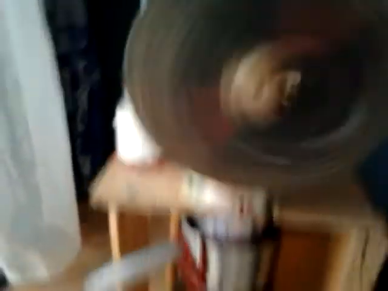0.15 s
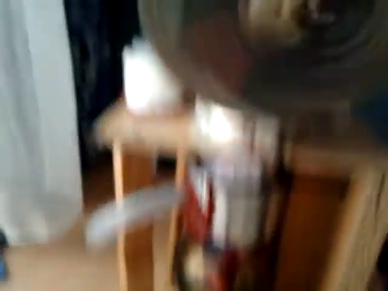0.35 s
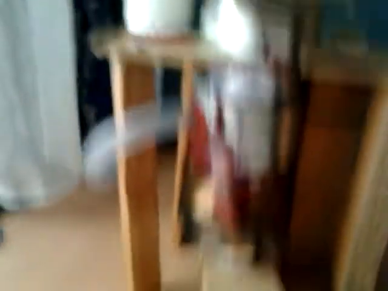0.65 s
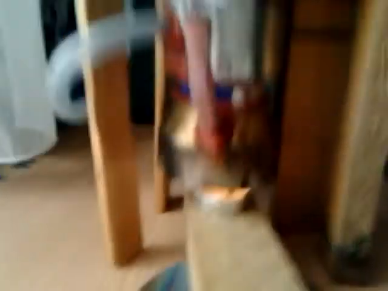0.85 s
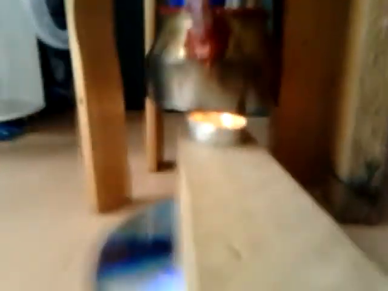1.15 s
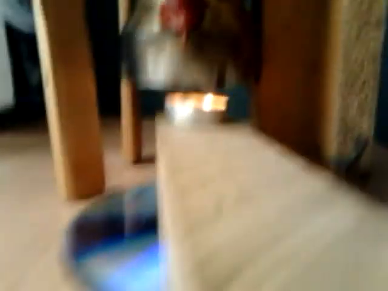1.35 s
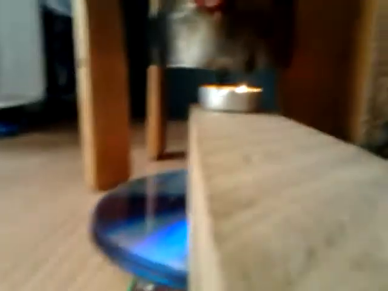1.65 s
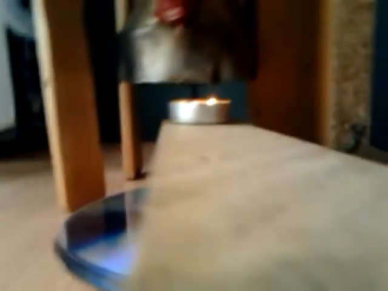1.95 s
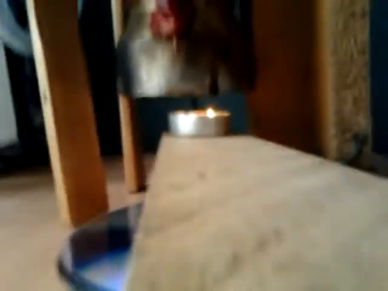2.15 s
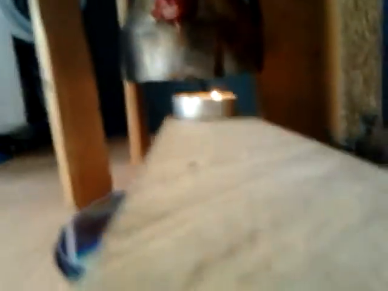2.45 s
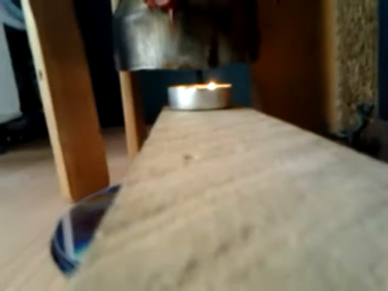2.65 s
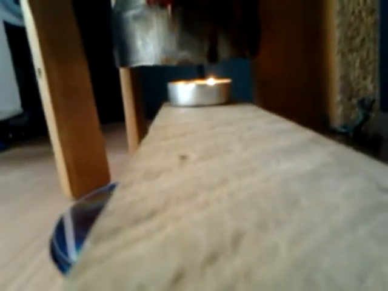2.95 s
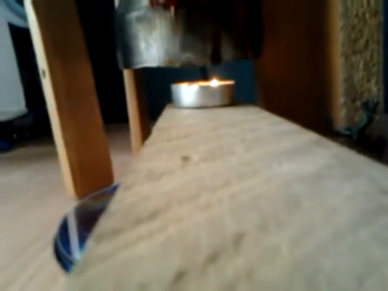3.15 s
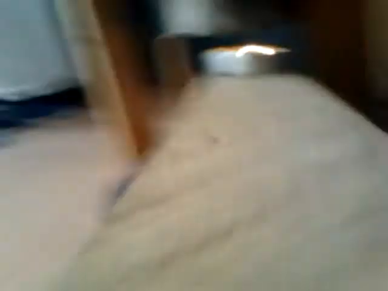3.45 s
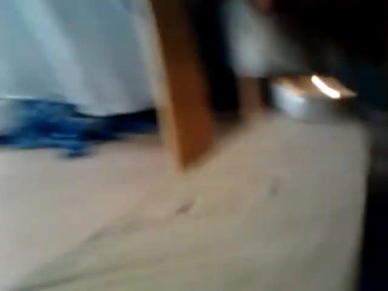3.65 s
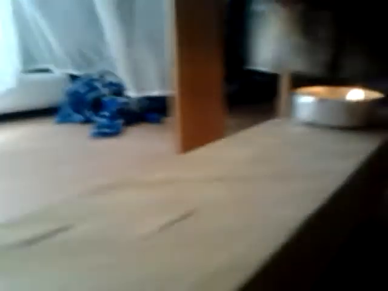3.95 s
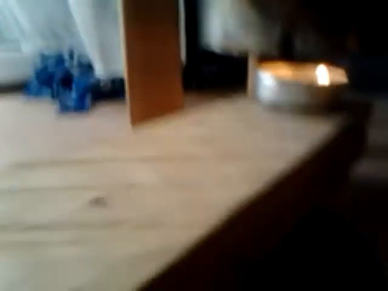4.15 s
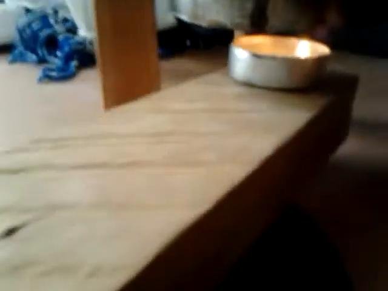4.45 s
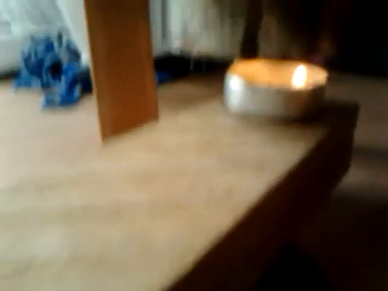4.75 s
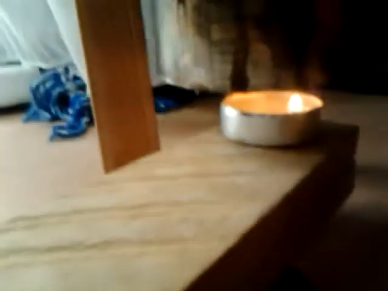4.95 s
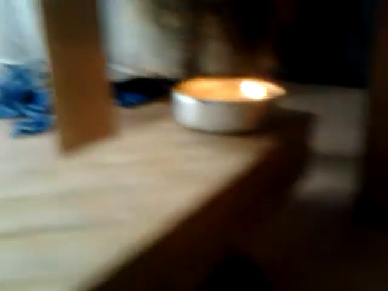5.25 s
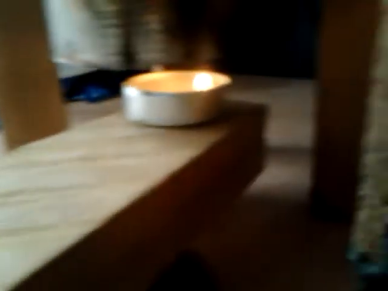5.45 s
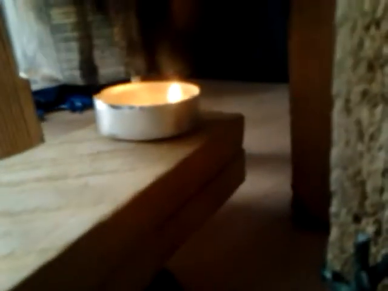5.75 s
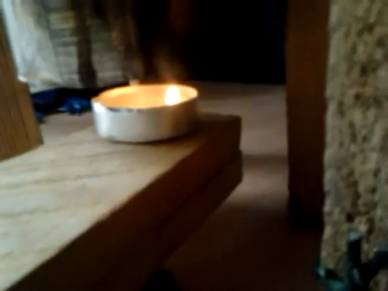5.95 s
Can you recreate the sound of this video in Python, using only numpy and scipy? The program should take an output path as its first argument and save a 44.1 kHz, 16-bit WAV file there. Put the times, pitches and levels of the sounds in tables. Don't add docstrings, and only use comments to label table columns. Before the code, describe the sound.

A small homemade heat engine runs evenly in a quiet room. Dull wooden thumps alternate with rattling metal clacks, each clack followed by a small double rebound, about five beats a second in all. Close on the hand-held microphone, fingers click and rub, busiest around a second and a half and again past three and a half seconds. Low bearing rumble and a faint gated electric whine and hiss lie underneath.

```python
import sys
import numpy as np
from scipy import signal
from scipy.io import wavfile
from scipy.ndimage import uniform_filter1d

SR = 44100
rng = np.random.default_rng(int(sys.argv[2]) if len(sys.argv) > 2 else 0)


def elevation(decibels):
    levels = np.asarray(decibels, float)
    return 10 ** (levels / 20)


def inscribe(sig):
    pcm = np.round(np.clip(np.atleast_2d(sig).T, -1, 1) * 32767)
    wavfile.write(sys.argv[1], SR, pcm.astype(np.int16))


N = 268772

# [t/s, level/dB, overtone level/dB, rod tick level/dB, rod tick lag/s]
THUMPS = [(0.059, -22.5, -5, 3, 0.021), (0.469, -20.5, -10, -41, 0.0078), (0.886, -17, -8, 1, 0.0035),
          (1.297, -17, -2, -8, 0.011), (1.707, -18, -4.5, -3, 0.0073), (2.12, -18.5, -5.5, -5.5, 0.0088),
          (2.528, -17.5, -4, 1, .003), (2.94, -17, -4, 0, 0.0029), (3.35, -17.5, -4.5, 7, 0.015),
          (3.757, -16, -2.5, -3, 0.015), (4.17, -17, -2.5, 13, 0.015), (4.579, -18.5, -6.5, -2.5, 0.014),
          (4.986, -17.5, -4, -7.5, 0.013), (5.394, -16.5, -4.5, -17.5, 0.011), (5.803, -17, -7.5, 1, .012)]
# [f/Hz, level/dB, t60/s]
FRAME = [(63.3, -20.5, .45), (98.4, -8, 0.14), (144, -17, 0.19), (193.4, -7, 0.11), (312, -9.5, 0.094),
         (357.2, -10, 0.068), (392, -7.5, 0.094)]


def thumps():
    s, db = np.transpose(THUMPS)[:2]
    t = np.arange(round(.013 * SR)) / SR
    swell = np.sin(np.pi * (t / t[-1]) ** 2.24)
    shove = swell * np.sin(2 * np.pi * 385 * t) / len(t) * 6.25
    after = np.arange(SR // 5) / SR
    knock = ring(np.pad(shove, (0, len(after) - len(t))), FRAME[4:])

    def choked(seconds):
        return knock * elevation(-14 * np.clip((after - seconds) / .007, 0, 1))

    out = strike(s - .006, db, [choked(.037)] * len(s))
    out += strike(s + 0.049, db - 15.5, [choked(.025)] * len(s))
    push = np.hanning(round(0.0018 * SR))
    out += high_pass(ring(strike(s, db - 43.0, [push] * len(s)), FRAME[:4]), 80)
    t = np.arange(round(0.051 * SR)) / SR
    rocking = np.sin(np.pi * t / t[-1]) * np.sin(2 * np.pi * 137 * t)
    return out + ring(strike(s + 0.04, db - 61, [rocking] * len(s)), FRAME[2:3])


# [f/Hz, level/dB, t60/s]
FRAME_OVERTONES = [(455, -8, .04), (520, -8, .04), (605, -7, .045), (700, -11, .05), (820, -10, .05)]
# [f/Hz, level/dB, t60/s]
CRANK = [(1764, 5.5, 0.048), (1880, -13, 0.005), (2020, 4, 0.018), (2661, 9, 0.034), (2874, -23.5, 0.09),
         (3600, -32, 0.025), (4100, -33.5, .012), (5940, -15, 0.0041), (6740, 3, 0.045), (7685, -17, .015),
         (8750, -51, 0.004)]


def rod_rattle():
    s, db, overtone_db, tick_db, tick_lag = np.transpose(THUMPS)
    db_over = db + overtone_db
    slack = [chatter(0.01, 2400) for _ in s]
    out = blows(s - .014, db_over - 13.5, slack, FRAME_OVERTONES[2:], vary_db=5.5, soft_hz=980)
    fade = np.exp(-np.arange(2400) / SR / 0.033) * 2.0
    dying = [chatter(0.053, 1500) * fade for _ in s]
    out += blows(s - .006, db_over - 4.0, dying, FRAME_OVERTONES, vary_db=5.0, soft_hz=1018.5)
    rod = loose(CRANK[:6] + [(1500, 0.0081, .04)])
    ticks = 0
    for lag, drop_db in ((.0, 40.8), (.013, 42.8), (.045, 49)):
        contacts = [chatter(.012, 4000) for _ in s]
        ticks = ticks + blows(s + tick_lag + lag, db + tick_db - drop_db, contacts, rod, vary_db=1.0, soft_hz=3500)
    return out + high_pass(ticks, 2000)


# [t/s, level/dB, web level/dB, shaft level/dB, sheen level/dB]
CLACKS = [(0.246, -14, -3, -15.5, -33), (0.661, -19.5, 5.5, -25, -25), (1.073, -20.5, -31, 10, 3),
          (1.482, -18.5, 9.5, -3.5, -1.5), (1.894, -17, 3, -1.5, -14), (2.307, -19, -3, 0.5, -17),
          (2.717, -17.5, -5.5, 1, -16.5), (3.128, -19.5, -6.5, 4, -9.5), (3.537, -13.5, -2, -2, -14),
          (3.946, -18.5, 0, 2, -20), (4.356, -14.5, 4.5, -8, -18), (4.762, -17.5, 4.5, -7.5, -20),
          (5.172, -15, 0, 1.5, -2.5), (5.581, -15, -3, -3.5, -7), (5.989, -19.5, 7.5, -17, -8)]
# [t/s, level/dB, brightness/dB, gap between bounces/s]
REBOUNDS = [(0.286, -22.5, -5, 0.0085), (0.7, -25.5, -9, 0.015), (1.113, -21, 0.5, 0.016),
            (1.932, -20, -9.5, 0.014), (2.345, -20, -17.5, 0.0097), (2.756, -19, -12.5, 0.0097),
            (3.165, -24.5, -2, 0.015), (3.574, -18.5, -26, 0.011), (3.979, -21, -23, 0.018),
            (4.391, -19.5, -9, 0.012), (4.8, -20, -7, 0.0084), (5.212, -18.5, -6, 0.0096),
            (5.619, -17.5, -15, 0.011), (6.026, -19, -5.5, 0.0073)]


def clacks():
    s, db, web_db, shaft_db, sheen_db = np.transpose(CLACKS)
    landings = [chatter(0.017, 7000, 1.5) for _ in s]
    out = pin(s - .001, db, web_db, shaft_db, sheen_db, landings, soft_hz=8330)
    s, db, bright_db, gap = np.transpose(REBOUNDS)
    bounces = []
    for g in gap:
        first, second = chatter(0.014, 5000, 1.1), chatter(0.013, 4600, 1.4)
        bounces.append(first + 0.57 * np.roll(second, round(g * SR)))
    return out + pin(s + 0.00045, db, bright_db - 13.0, bright_db, bright_db + 6, bounces, soft_hz=7360)


# [f/Hz, level/dB, t60/s]
CAN = [(460, -16.5, 0.024), (627, 0.5, 0.084), (712, 5.5, 0.04), (804.4, 10.5, 0.034), (1076, -5.5, 0.039)]


def pin(s, db, web_db, shaft_db, sheen_db, shapes, soft_hz):
    early = s - .003
    can = blows(early, db - 17.5, shapes, CAN, vary_db=1.5, soft_hz=2350)
    web = blows(early, db + web_db - 11.0, shapes, loose(CRANK[:3]), vary_db=2.0, soft_hz=soft_hz)
    shaft = blows(early, db + shaft_db - 9.0, shapes, loose(CRANK[3:7]), vary_db=2.0, soft_hz=soft_hz)
    sheen = blows(early, db + sheen_db - 15.5, shapes, loose(CRANK[7:]), vary_db=7.5, soft_hz=soft_hz)
    frame = blows(s, db - 21, shapes, FRAME[3:4], vary_db=3.0, soft_hz=300)
    grit = band_pass(strike(early, db - 16.5, shapes), 583, 3940, order=4)
    rattle = high_pass(web + shaft, 1500) + high_pass(high_pass(sheen, 7400), 7400) + grit
    return high_pass(can, 350) + low_pass(rattle, 9300, order=8) + frame


# [lead/s, level under the clack/dB]
SLIDES = [(.02, -43), (.034, -30), (.03, -55), (.03, -42), (.03, -36), (.03, -34), (.03, -38), (.028, -42),
          (.03, -33), (.03, -31), (.03, -31), (.03, -42), (.03, -52), (.034, -51), (.04, -40)]


def pin_slide():
    s, db = np.transpose(CLACKS)[:2]
    lead, under_db = np.transpose(SLIDES)
    scrapes = [chatter(d, 5000, .9) for d in lead]
    return high_pass(blows(s - lead, db + under_db, scrapes, loose(CRANK[:3]), vary_db=2.5, soft_hz=3000), 1300)


# [t/s, level/dB]
SQUEAKS = [
    (4.813, -35),
    (5.22, -41.5),
]
# [f/Hz, level/dB, t60/s]
BEARING = [(6254, 3, 0.044), (8000, -3, 0.02), (4300, -24, .006)]


def squeaks():
    s, db = np.transpose(SQUEAKS)
    slips = [chatter(0.014, 6700) for _ in s]
    return high_pass(blows(s, db, slips, BEARING, vary_db=0.0, soft_hz=9000), 2930)


def fingers():
    return high_pass(finger_ticks() + finger_knocks() + finger_rub(), 510)


# [t/s, level/dB, hollow ring level/dB, top f/Hz]
TICKS = [(0.0722, -33.5, -24, 7080), (0.3151, -7, -18.5, 6500), (0.9047, -13, -8.5, 12000),
         (1.2161, -50, 15.5, 6000), (1.3018, -20, -9, 7450), (1.361, -26, -15, 4970),
         (1.373, -21.5, -8.5, 6000), (1.4875, -2, -39, 9000), (1.4908, 6.5, -42, 15000),
         (1.5603, -6.5, -16.5, 11000), (1.636, -33, -12, 7500), (1.6557, -16.5, -15.5, 5860),
         (1.6728, -21.5, -17.5, 5500), (1.8137, -12.5, -16, 13000), (1.952, -21.5, -9.5, 5400),
         (1.9644, -26.5, -9.5, 4500), (1.9864, -23.5, -11.5, 7000), (2.5951, -51, 19, 3500),
         (2.7848, -22.5, -23, 4300), (3.3232, -22.5, -19, 9000), (3.3478, -42.5, -8.5, 5880),
         (3.4141, -17.5, -32, 9000), (4.0034, -32.5, -2, 8000), (4.107, -32, -6, 5500),
         (4.125, -25, -14, 7000), (4.184, -36, -7, 5000), (4.4825, -35.5, -3.5, 7150),
         (5.1392, -51, -24, 7500)]
# [f/Hz, level/dB, t60/s]
CASE = [(1433, -16.5, 0.0048), (3080, -2, 0.0086), (3580, -2, 0.0059), (4734, 5, 0.0026),
        (6440, -9.5, 0.0016), (8650, -13.5, 0.011), (12200, -28.5, 0.0054), (14760, -21.5, .002)]
# [f/Hz, level/dB, t60/s]
HOLLOW = [(754, 2, 0.1), (766, 7.5, 0.05), (830, -12, 0.034)]


def finger_ticks():
    s, db, hollow_db, top_hz = np.transpose(TICKS)
    snaps = [chatter(0.0006, 20000) for _ in s]
    case = blows(s, db - 13.5, snaps, CASE, vary_db=-5.5, soft_hz=top_hz)
    hollow = blows(s, db + hollow_db - 7.5, snaps, loose(HOLLOW), vary_db=2.0, soft_hz=2670)
    return case + hollow + band_pass(strike(s, db - 26.5, snaps), 900, 7000, order=2)


# [t/s, level/dB]
KNOCKS = [
    (4.301, -14),
    (4.313, -15.5),
    (4.322, -18),
    (4.337, -22.5),
    (4.711, -44.5),
    (4.932, -48),
    (5.124, -68.5),
    (5.512, -31),
]


def finger_knocks():
    s, db = np.transpose(KNOCKS)
    pads = [chatter(.007, 6000) for _ in s]
    dull_modes = CAN[1:] + [(1350, -3, .012), (1750, -8, .01)]
    return blows(s - .001, db - 14, pads, dull_modes, vary_db=2.5, soft_hz=1800)


# [f/Hz, level per Hz/dB]
RUB_COLOUR = [(590, -34), (1000, -3.5), (1410, -11), (2590, -3.5), (5650, -3.5), (10400, -21.5),
              (14100, -37.5), (15500, -47)]
# [f/Hz, level/dB, t60/s]
SHELL = [(2890, -5, 0.009), (5350, 4, 0.0036)]
# [t/s, level/dB]
SHELL_GRIP = [(0.0, -13), (1.0, -13), (1.3, 4), (1.6, 0), (3.4, -13), (3.9, -4), (4.5, -2)]
# [t/s, level/dB]
AT_PORT = [(0.0, -13), (0.3, -24), (1.4, -15), (1.5, -19), (1.7, -24), (3.3, -16), (3.45, -6.5), (3.49, -6),
           (3.53, -14), (3.6, -13), (3.64, -2), (3.7, -4), (3.73, -13.5), (3.76, -21), (3.79, -5),
           (3.86, -1.5), (3.95, -15)]


def finger_rub():
    grains = rng.standard_normal((2, N)) * elevation(2.1 * rng.exponential(1, (2, N)) + 1.6 * drift(90))
    hiss = coloured(grains, RUB_COLOUR, patchy_db=1.5)
    hollow = rms_one(ring(grains[0], HOLLOW))
    pressure_db, bright_db = stroking()
    pressure = elevation(pressure_db + 0.5 * drift(35))
    cupping = pressure * elevation(-9.5 + 6.5 * drift(12))
    walls = rms_one(ring(low_pass(grains[1], 6000, order=4), SHELL))
    hiss = hiss + elevation(in_time(SHELL_GRIP)[0]) * walls
    low = signal.sosfiltfilt(signal.butter(3, 5830, fs=SR, output="sos"), hiss)
    brighter = np.minimum(pressure / elevation(-40), 1.3) ** 2.1
    hiss = low + (hiss - low) * brighter * elevation(bright_db)
    low = signal.sosfiltfilt(signal.butter(4, 10300, fs=SR, output="sos"), hiss)
    hiss = low + (hiss - low) * elevation(in_time(AT_PORT)[0])
    return 0.83 * pressure * hiss + cupping * hollow


# [start t/s, length/s, first pressure level/dB, last pressure level/dB, brightness/dB]
STROKES = [(0.074, 0.017, -44.5, -62, 2), (0.245, 0.05, -55, -60, -3), (0.311, 0.11, -46, -58, 11),
           (0.577, 0.11, -103, -56, 6), (1.087, 0.05, -48.5, -33.5, -11.5), (1.172, 0.042, -78, -56.5, -1),
           (1.301, 0.035, -46, -53, 4), (1.37, 0.15, -45.5, -32.5, -7), (1.491, 0.067, -27, -31.5, -11),
           (1.578, 0.1, -48.5, -52, 4), (1.887, 0.17, -56, -61.5, 0), (2.794, 0.042, -58, -71, -9.5),
           (3.348, 0.023, -50, -65.5, -0.5), (3.416, 0.063, -53.5, -34.5, 0), (3.471, 0.03, -36, -31, 5),
           (3.497, 0.047, -31.5, -34.5, -7.5), (3.562, 0.062, -43.5, -40, 7),
           (3.597, 0.061, -39.5, -30, -2), (3.658, 0.066, -29.5, -41, -1.5),
           (3.71, 0.062, -34.5, -35.5, -9), (3.75, 0.092, -35.5, -34.5, 3.5), (3.81, 0.049, -34, -36, -1.5),
           (3.994, 0.037, -60, -48, -11), (4.056, 0.034, -52, -47.5, -14), (4.104, 0.036, -48, -46, -16),
           (4.171, 0.056, -52.5, -55, -4), (4.27, 0.04, -67.5, -68, -9.5), (4.291, 0.022, -60, -55, -22),
           (4.338, .02, -53, -59, -9), (4.37, 0.022, -46, -57, -2), (4.397, 0.017, -54, -43, 14),
           (4.415, 0.017, -58, -59, 0), (4.485, 0.005, -49.5, -62, 7)]


def stroking():
    press_db_s, lift_db_s = 1502.5, 698
    afterglow_db, afterglow_db_s = -10.5, 305
    t = np.arange(0, N, 40)[:, None] / SR
    s, seconds, first_db, last_db, bright_db = np.transpose(STROKES)
    slide_db = first_db + (last_db - first_db) * np.clip((t - s) / seconds, 0, 1)
    slide_db = slide_db - press_db_s * np.maximum(s - t, 0)
    after = np.maximum(t - s - seconds, 0)
    each_db = slide_db + np.maximum(-lift_db_s * after, afterglow_db - afterglow_db_s * after)
    leading_db = uniform_filter1d(bright_db[np.argmax(each_db, axis=1)], size=15)
    return [np.interp(np.arange(N) / SR, t[:, 0], v) for v in (np.max(each_db, axis=1), leading_db)]


# [t/s, level/dB]
RUMBLE = [(0.0, -51.5), (0.45, -67), (0.75, -54), (1.15, -93), (1.6, -55.5), (2.3, -72), (2.85, -48.5),
          (3.2, -78.5), (4.1, -51), (4.55, -67.5), (5.3, -59.5), (5.7, -74), (6.09, -81)]
# [f/Hz, level per Hz/dB]
RUMBLE_COLOUR = [(180, -65), (300, -16), (406, -26), (730, 16), (946, -1), (1240, -65), (1560, -19.5),
                 (1700, -29), (4000, -43.5), (5200, -54), (8800, -120)]
# [f/Hz, level per Hz/dB]
BASS_COLOUR = [(12, -1), (25, -13), (45, -1), (80, 2.5), (150, -1.5), (300, -7), (400, -29)]


def rumble(engine):
    near_db, = in_time(RUMBLE)
    white = rng.standard_normal((2, N))
    hump = coloured(white, RUMBLE_COLOUR, patchy_db=2.8)
    blow_db = 10 * np.log10(uniform_filter1d(engine ** 2, size=512) + 1e-14)
    shake = elevation(fading(blow_db, fall_db_s=153) - 33.5)
    grip = elevation(-49 + 0.51 * (stroking()[0] + 37.0))
    bass = elevation(-64 + 0.23 * (near_db + 60.5))
    return (elevation(near_db) + shake + grip) * hump + bass * coloured(white, BASS_COLOUR, patchy_db=-4.5)


# [t/s, level/dB, brightness/dB]
WHINE = [(0.0, -73, -17.5), (0.45, -72.5, -5.5), (0.62, -78.5, -22), (0.85, -76, 0), (1.55, -58.5, -26),
         (1.72, -115, -1), (1.8, -115, -14), (1.84, -71, 0.5), (2.05, -81, -16), (2.95, -85, -9.5),
         (3.2, -78.5, -3), (3.9, -72, -4), (4.1, -104, -38), (4.3, -101, -13), (4.4, -88, -4.5),
         (4.7, -100, 12.5), (5.2, -93, 13), (6.09, -93, 16.5)]
# [t/s, f/Hz]
WHINE_PITCH = [(0.0, 1504.0), (0.28, 1485.0), (0.56, 1505.0), (0.84, 1532.0), (1.26, 1516.0),
               (1.54, 1531.0), (1.96, 1525.0), (2.52, 1525.0), (3.08, 1518.0), (3.36, 1473.0),
               (3.5, 1518.0), (4.06, 1536.0), (4.34, 1530.0), (4.62, 1540.0), (5.04, 1535.0),
               (5.46, 1532.0), (5.74, 1514.0), (6.02, 1522.0)]
# [multiple of f, level/dB]
LOWER_ORDERS = [(1, -16), (2, -9), (3, -14.5), (4, 8), (5, -1)]
# [multiple of f, level/dB]
UPPER_ORDERS = [(6, -3), (7, 0), (8, -26), (9, -18)]
# [f/Hz, level per Hz/dB]
HISS_COLOUR = [(1000, -1), (2000, -0.5), (3500, -2), (6000, -20), (10000, -19.5), (12000, -40)]


def whine(gate_db):
    hz, = in_time(WHINE_PITCH)
    lower_db, bright_db = in_time(WHINE)
    phase = 2 * np.pi * np.cumsum(hz * (1 + .0025 * drift(20) + .003 * drift(150))) / SR
    rides = elevation(stroking()[0] - 35.5)
    hiss = coloured(rng.standard_normal((2, N)), HISS_COLOUR, patchy_db=6.5)
    out = elevation(gate_db + 2.5) * hiss + elevation(lower_db - 8.5) * high_pass(hiss, 4000)
    lower = elevation(lower_db - 8.5) + elevation(gate_db - 5.5)
    upper = elevation(np.minimum(lower_db + bright_db, -72)) + elevation(gate_db - 29.0)
    for gain, orders in ((lower, LOWER_ORDERS), (upper, UPPER_ORDERS)):
        for k, db in orders:
            fuzz = (1 + .55 * drift(120)) * (1 + rides / (gain + 1e-9) * (k > 3))
            out = out + np.sqrt(2) * gain * elevation(db) * fuzz * np.sin(round(k) * phase)
    return out


def suppressor(loud):
    level_db = 10 * np.log10(uniform_filter1d(high_pass(loud, 2500) ** 2, size=256) + 1e-14)
    return fading(np.minimum(level_db - 32, -54), fall_db_s=233)


def room(x):
    t60_s, wall_cut_hz = 0.24, 4500
    out, dull = np.zeros(N), np.exp(-2 * np.pi * wall_cut_hz / SR)
    for k, lag in enumerate((rng.uniform(.011, .037, 8) * SR).astype(int)):
        loop, gain, state = x.copy(), elevation(-60 * lag / SR / t60_s), [0.]
        for i in range(lag, N, lag):
            back, state = signal.lfilter([gain * (1 - dull)], [1, -dull], loop[i - lag:i], zi=state)
            loop[i:i + lag] += back[:N - i]
        out += (loop - x) * (-1) ** k
    return out


def blows(times, db, shapes, modes, vary_db, soft_hz):
    luck = rng.standard_normal((len(times), len(modes), 2))
    rings, tail = [], round(SR * max(t60 for hz, level_db, t60 in modes))
    for shape, chance, cut_hz in zip(shapes, luck, np.broadcast_to(soft_hz, len(times))):
        force = low_pass(np.pad(shape, (0, tail)), min(cut_hz, .45 * SR), order=5)
        varied = [(hz * (1 + 0.039 * a), level_db + vary_db * b, t60)
                  for (hz, level_db, t60), (a, b) in zip(modes, chance)]
        rings.append(ring(force, varied))
    return strike(times, db, rings)


def strike(times, db, shapes):
    out = np.zeros(N + SR)
    for s, level_db, shape in zip(times, db, shapes):
        i = max(round(s * SR), 0)
        out[i:i + len(shape)] += elevation(level_db) * shape
    return out[:N]


def chatter(seconds, per_s, peaked=1):
    chance, strength = rng.random((2, 2400))
    u = np.arange(2400) / (seconds * SR)
    window = np.sin(np.pi * np.minimum(u, 1) ** 0.76) ** peaked
    hits = (chance < per_s / SR) * (2 * strength - 1) * window
    return hits / np.sqrt(np.sum(hits ** 2) + 1e-20)


def ring(force, modes):
    out = 0
    for hz, db, t60 in modes:
        r, w = elevation(-60 / (max(t60, .001) * SR)), 2 * np.pi * hz / SR
        out = out + signal.lfilter([0, elevation(db) * np.sin(w)], [1, -2 * r * np.cos(w), r * r], force + 1e-18)
    return out


def loose(modes):
    return [(hz, db, min(t60, 28 / hz)) for hz, db, t60 in modes]


def coloured(source, spectrum, patchy_db):
    hz, db = np.transpose(spectrum)
    edges = hz[0] * 2 ** np.arange(0, np.log2(hz[-1] / hz[0]), 1 / 3)
    out = 0
    for k, (low, high) in enumerate(zip(edges, edges[1:])):
        band = band_pass(source[k % 2], low, high, order=2)
        level_db = np.interp(np.log(low * high) / 2, np.log(hz), db)
        out = out + band * elevation(level_db + patchy_db * drift(39))
    return rms_one(out)


def drift(rate):
    r = np.exp(-80 * np.pi * rate / SR)
    slow = signal.lfilter([1], [1, -2 * r, r * r], rng.standard_normal(N // 40 + 2002))[2000:]
    return np.interp(np.arange(N) / 40, np.arange(len(slow)), rms_one(slow))


def fading(level_db, fall_db_s):
    ramp = fall_db_s * np.arange(N) / SR
    return np.maximum.accumulate(level_db + ramp) - ramp


def in_time(rows):
    s, *columns = np.transpose(rows)
    return [np.interp(np.arange(N) / SR, s, c) for c in columns]


def rms_one(x):
    return x / np.sqrt(np.mean(x ** 2) + 1e-20)


def high_pass(x, hz):
    return signal.sosfilt(signal.butter(3, hz, "high", fs=SR, output="sos"), x)


def low_pass(x, hz, order):
    return signal.sosfilt(signal.butter(order, hz, fs=SR, output="sos"), x)


def band_pass(x, low_hz, high_hz, order):
    return signal.sosfilt(signal.butter(order, [low_hz, high_hz], "band", fs=SR, output="sos"), x + 1e-18)


def scene():
    engine = thumps() + rod_rattle() + clacks() + pin_slide()
    loud = engine + elevation(-17) * room(engine) + fingers() + squeaks()
    return (loud + rumble(engine) + whine(suppressor(loud)))[None]


def top_cut(x):
    return signal.sosfilt(signal.butter(12, 15930, fs=SR, output="sos"), x)


def record(dry):
    rounded = .85 * np.tanh(dry / .85)
    band = signal.sosfilt(signal.butter(1, 12, "high", fs=SR, output="sos"), rounded)
    band = signal.sosfilt(signal.cheby2(10, 60, 15600, fs=SR, output="sos"), band)
    return top_cut(band)


dry = scene()
out = record(dry)
inscribe(out)
```